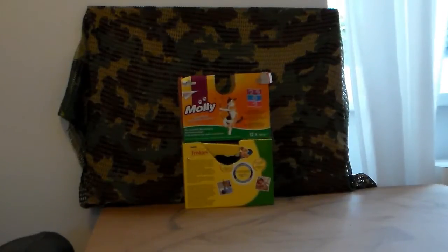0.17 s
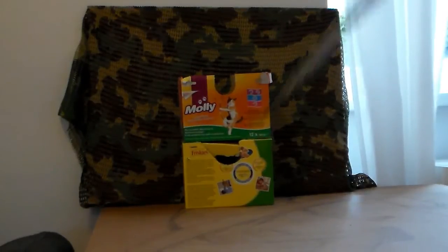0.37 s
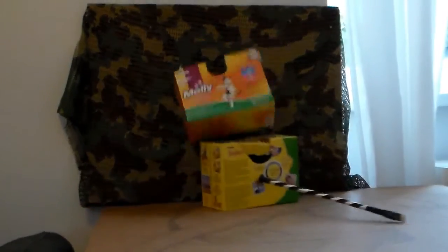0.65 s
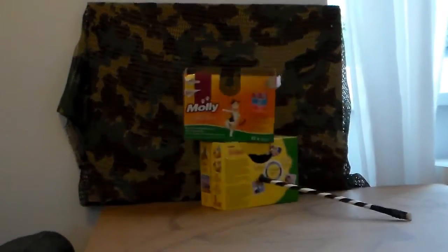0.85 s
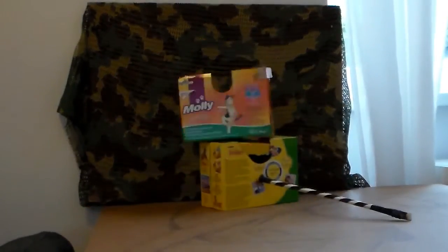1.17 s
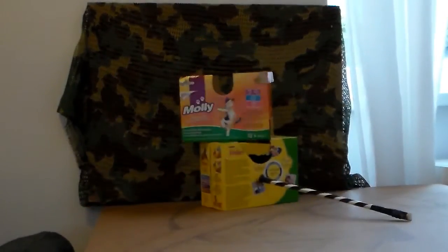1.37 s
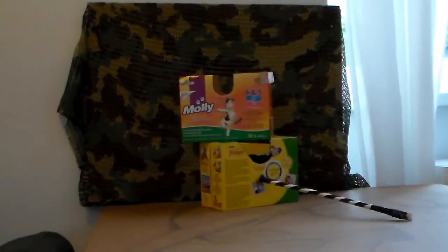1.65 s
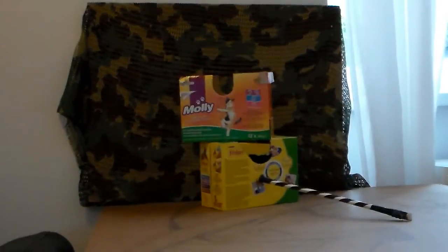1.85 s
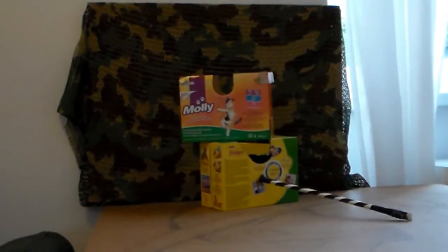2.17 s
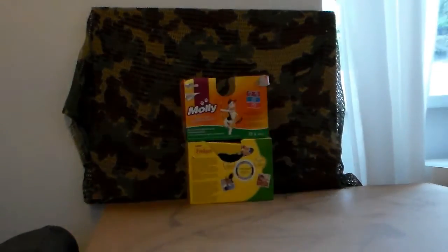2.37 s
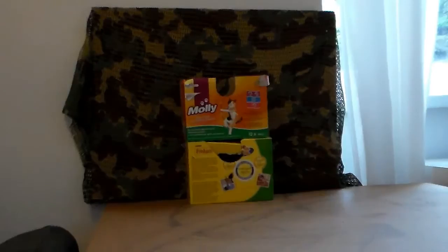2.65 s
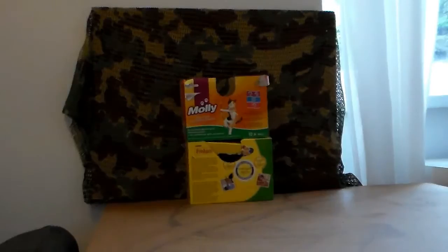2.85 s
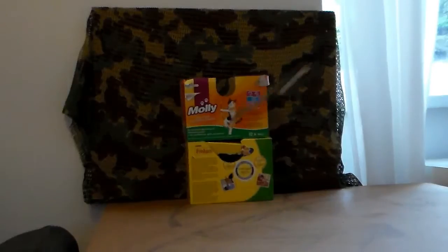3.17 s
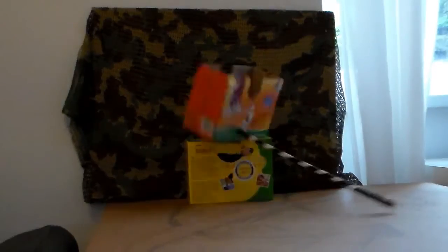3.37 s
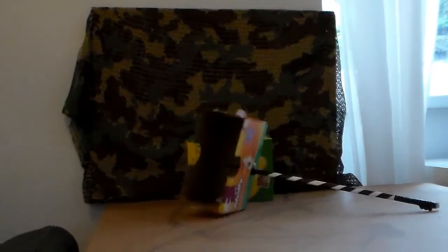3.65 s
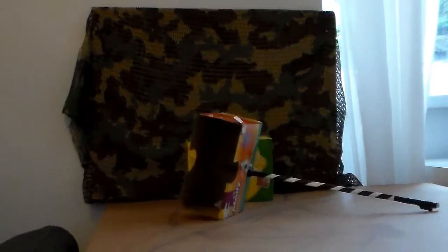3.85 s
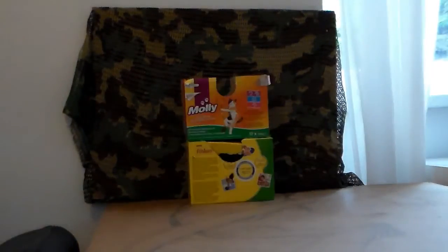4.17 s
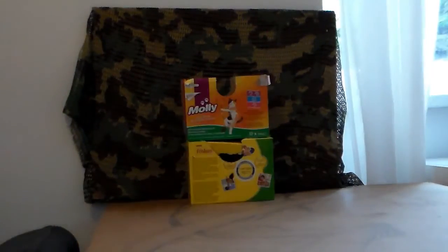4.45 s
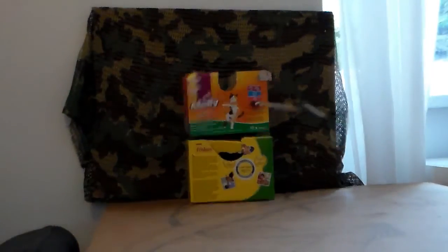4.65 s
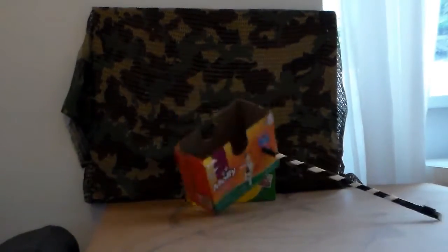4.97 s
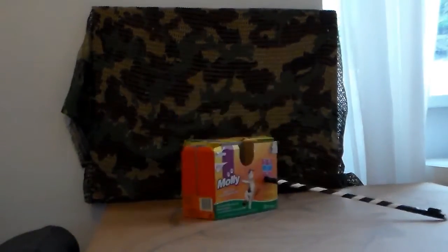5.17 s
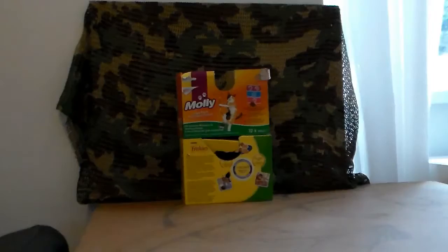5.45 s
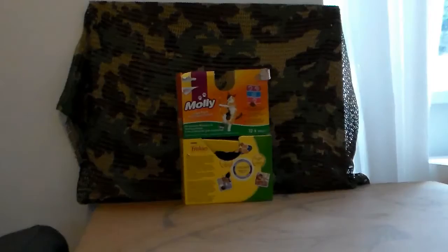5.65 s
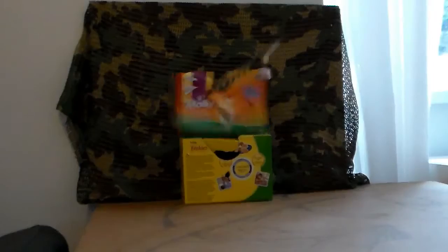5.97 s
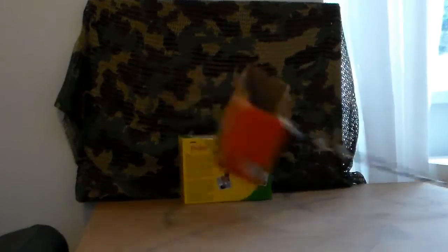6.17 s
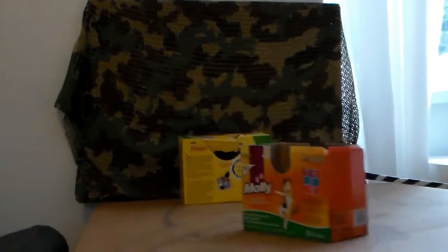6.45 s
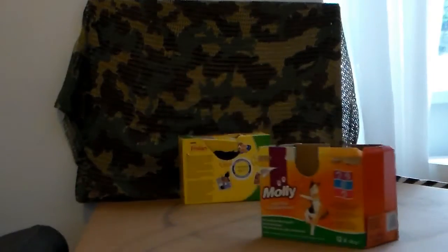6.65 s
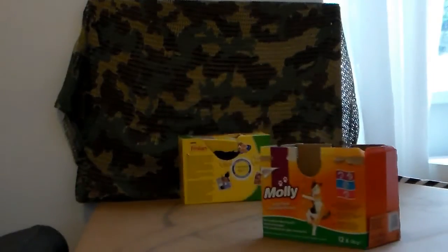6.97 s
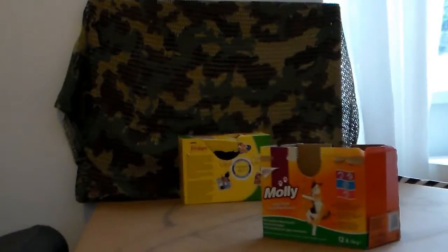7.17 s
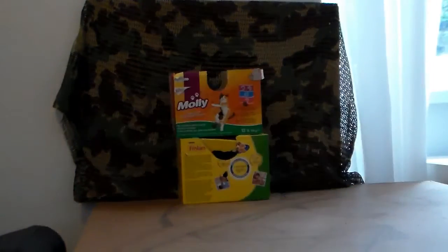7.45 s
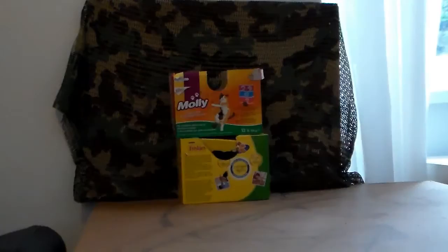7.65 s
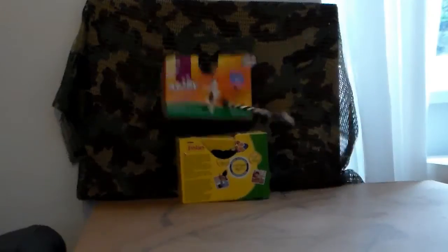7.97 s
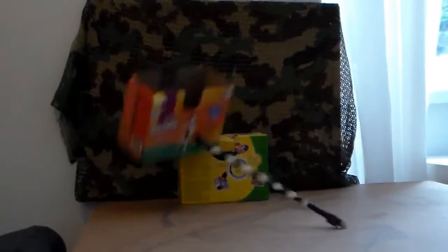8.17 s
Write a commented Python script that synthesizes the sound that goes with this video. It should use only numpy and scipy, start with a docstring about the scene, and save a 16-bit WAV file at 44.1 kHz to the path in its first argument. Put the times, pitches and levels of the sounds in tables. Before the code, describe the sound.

Close to the microphone, a launcher's catch clicks and its rubber bands crack brightly. A moment later, across a table, an arrow punches through a hollow cardboard box with a boomy, tearing smack, and the box rattles and bumps down. This happens five times, with varied tumbles. Between shots come a faint steady motor hum and room noise, which duck after each snap. Small, lively room, stereo.

```python
"""Close to the microphones a rubber-band launcher fires five arrows: its catch clicks and its bands snap, as
short bursts of shaped noise. Across the table in a small room stand stacked cardboard boxes: the arrow smacks
through the card and the box tumbles and bumps on the table, as ringing modes, noise bursts and rattling.
Far off a motor hums, as a sum of sines, over the noise of the room; this background dips after each snap and
changes level between the shots. The room answers with dense, decaying noise."""
import sys
import numpy as np
from scipy import signal
from scipy.fft import rfft, irfft
from scipy.io import wavfile
from scipy.ndimage import uniform_filter1d

SR = 44100
rng = np.random.default_rng(int(sys.argv[2]) if len(sys.argv) > 2 else 0)


def wrap_up_sound(samples):
    """Save the sound to the file named by the first command line argument, as 16-bit audio."""
    columns = np.atleast_2d(samples).T
    # keep every value between -1 and 1, then stretch to whole-number steps
    tamed = np.clip(columns, -1, 1)
    steps = np.round(tamed * 32767).astype(np.int16)
    wavfile.write(sys.argv[1], SR, steps)


N = 366230

# moments at which the rattling and the dips end, whatever is left of them: time [s]
CUTOFFS_S = [3.925, 5.428, 7.225]


def from_db(db):
    """Gain of a level in dB."""
    return 10 ** (np.asarray(db) / 20)


def rms_one(x):
    """Scaled to rms 1."""
    return x / np.sqrt(np.mean(x ** 2) + 1e-20)


def at_hz(points, hz):
    """A curve of (frequency, value) points read on a log-frequency axis."""
    points = np.array(points)
    return np.interp(np.log(hz), np.log(points[:, 0]), points[:, 1])


def add(track, s, sound):
    """Mixes a sound in from time s."""
    at = round(s * SR)
    track[..., at:at + sound.shape[-1]] += sound[..., :N - at]


def next_cutoff(s, otherwise):
    """The first cutoff after time s, or the given time if that is earlier."""
    return min([otherwise] + [end for end in CUTOFFS_S if end > s])


def ring(push, hz, t60):
    """A damped resonator: a unit click sets a sine of initial height 1 ringing."""
    radius = from_db(-60 / (max(t60, .003) * SR))
    turn = 2 * np.pi * hz / SR
    return signal.lfilter([0, np.sin(turn)], [1, -2 * radius * np.cos(turn), radius ** 2], push + 1e-18)


def burst(spectrum, length, peak_hz, peak_db):
    """A crackle of uneven grain, dying exponentially, peak 1; and the same grain with an even colour."""
    size = 4096
    hz = np.fft.rfftfreq(size, 1 / SR) + 1
    lift_db = peak_db * np.exp(-(np.log2(hz / peak_hz) / 0.44) ** 2)
    colour = from_db(at_hz(spectrum, hz) + lift_db)
    fold = np.r_[1, np.full(size // 2 - 1, 2), 1, np.zeros(size // 2 - 1)]
    causal = np.exp(rfft(irfft(np.log(colour), size) * fold))   # minimum phase: nothing sounds early
    dying = np.exp(-np.arange(size) / SR / max(length, .0003))
    uneven = from_db(4.5 * rng.standard_normal(size))
    grains = rfft(rng.standard_normal(size) * uneven * dying)
    both = np.array([grains, grains / np.abs(grains)]) * causal
    crackle, even = irfft(both, size) * np.linspace(1, 0, size)
    crackle = crackle / np.abs(crackle).max()
    return np.array([crackle, rms_one(even * np.sqrt(dying)) * np.std(crackle)])


BAND_EDGES_HZ = 18 * 2 ** np.arange(0, 10.1, .5)


def stereo_bands(size, likeness):
    """Half-octave bands of stereo noise, each with its centre frequency; likeness sets mid against side."""
    white = rng.standard_normal((2, 2, size))
    for k, (low, high) in enumerate(zip(BAND_EDGES_HZ, BAND_EDGES_HZ[1:])):
        band = signal.butter(2, [low, high], "band", fs=SR, output="sos")
        mid, side = signal.sosfilt(band, white[k % 2])
        hz = np.sqrt(low * high)
        alike = np.clip(at_hz(likeness, hz), -1, 1)
        yield hz, np.sqrt(1 + alike) * mid + np.sqrt(1 - alike) * side * [[1], [-1]]


# background of each stretch, before the dips:
# (start [s], hum [dB], room murmur [dB], hiss [dB], rumble [dB], high hiss [dB])
BACKGROUND_STRETCHES = [(0, -45, -54.5, -55.5, -52.5, -63), (1.0, -47.5, -57, -58.5, -53.5, -65),
                        (2.327, -47, -53.5, -58, -52.5, -66), (3.925, -41, -47.5, -52.5, -50.5, -61.5),
                        (5.428, -50, -41.5, -47, -47, -58.5), (6.6, -52, -48, -54, -52, -65.5),
                        (7.225, -44.5, -49, -53, -48, -61.5)]
# dips of the background, a negative depth being a rise:
# (time [s], noise depth [dB], hold [s], recovery [s], hum depth [dB], extra hold of the hum [s])
BACKGROUND_DIPS = [(0.402, 15, 0.35, 0.16, 19, .1), (3.16, 10, 0.057, 0.16, 27, .6),
                   (3.77, 1, .12, .1, 1, .1), (4.585, 17, 0.35, 0.21, 28, .5), (5.19, 9, 0.25, .1, 3, .1),
                   (5.96, 25.5, 0.52, 0.055, 26, .1), (6.497, 20, .08, 0.071, 6, 0.054),
                   (7.874, -4.5, .04, .03, 18, 0.032), (7.912, 21, 0.18, 0.51, 27, .2)]
# part of the noise depth that each layer takes: murmur, hiss, rumble, high hiss [share]
DIP_SHARES = [0.99, .6, 0.96, 0.45]
DIP_FALL_S = 0.019


def background_levels():
    """Steady levels that step between stretches, less the dips: hum, murmur, hiss, rumble, high hiss in dB."""
    t = np.arange(N) / SR
    starts, *levels = np.transpose(BACKGROUND_STRETCHES)
    stretch = np.maximum(np.searchsorted(starts, t, "right") - 1, 0)
    steady = np.array(levels)[:, stretch]
    noise_dip, hum_dip = np.zeros((2, N))
    for s, depth_db, hold, back, hum_db, hum_longer in BACKGROUND_DIPS:
        active = t < next_cutoff(s, N / SR)
        noise_corners = np.cumsum([0, DIP_FALL_S, hold, back])
        hum_corners = np.cumsum([0, DIP_FALL_S, hold + hum_longer, back])
        noise_dip += active * np.interp(t - s, noise_corners, [0, depth_db, depth_db, 0])
        hum_dip += active * np.interp(t - s, hum_corners, [0, hum_db, hum_db, 0])
    dips = np.vstack([hum_dip, np.outer(DIP_SHARES, noise_dip)])
    return uniform_filter1d(steady - dips, size=300)   # smoothed over about 7 ms


# partials of the far motor: (multiple of HUM_HZ, relative level [dB])
MOTOR_PARTIALS = [(4, -34), (5, -14.5), (7, -21), (8, -22), (9, 0.5), (12, -25), (20, -26)]
HUM_HZ, HUM_SKIP_S = 97.05, 2.327   # the fundamental's phase skips half a turn at that time
# colour of the room's own noise inside each layer: (frequency [Hz], relative density [dB per Hz])
ROOM_TONE = [(20, -10), (51, -11.5), (110, -22.5), (160, -21.5), (280, -17.5), (480, -19.5), (700, -23.5),
             (1000, -25), (2000, -30.5), (4000, -38), (8000, -44), (14000, -49)]
# how alike the two microphones hear that noise: (frequency [Hz], left-right likeness [0-1])
ROOM_TONE_LIKENESS = [(60, 0.87), (130, 0.83), (290, 0.95), (630, 0.96), (1390, 0.82), (3060, 0.57),
                      (6720, 0.15), (14800, 0.011)]


def background():
    """A far motor's harmonics, slightly louder on the left, over four layers of the room's own noise."""
    hum_db, murmur_db, hiss_db, rumble_db, high_db = background_levels()
    skip = np.pi * (np.arange(N) > HUM_SKIP_S * SR)
    turn = 2 * np.pi * HUM_HZ * np.arange(N) / SR + skip
    hum = sum(from_db(db) * np.sqrt(2) * np.sin(k * turn + k * k) for k, db in MOTOR_PARTIALS)
    layers = np.zeros((4, 2, N))
    for hz, band in stereo_bands(N, ROOM_TONE_LIKENESS):
        layer = np.searchsorted([90, 1000, 6000], hz)   # borders in Hz
        layers[layer] += from_db(at_hz(ROOM_TONE, hz)) * band
    layer_levels = [rumble_db, murmur_db, hiss_db, high_db]
    noise = sum(from_db(db) * rms_one(layer) for db, layer in zip(layer_levels, layers))
    left_right = from_db([[.3], [-.3]])
    return from_db(hum_db) * hum * left_right + noise


# decay of the small room: (frequency [Hz], t60 [s])
ROOM_T60 = [(100, 0.93), (300, 0.62), (700, 0.43), (1500, 0.45), (3000, 0.39), (6000, 0.42), (12000, 0.24)]
# colour of its answer: (frequency [Hz], relative level [dB])
ROOM_COLOUR = [(100, -22.5), (300, -5), (700, 0), (1500, 7), (3000, 11), (6000, 2), (12000, 12)]
# how alike the answer is at both microphones: (frequency [Hz], left-right likeness [0-1])
ROOM_LIKENESS = [(100, 0.87), (700, 0.99), (2000, 0.81), (5000, 0.48), (12000, 1)]


def room(x):
    """The room answers with dense noise that builds up in a few ms and dies band by band."""
    t = np.arange(SR // 2) / SR
    echo = np.zeros((2, len(t)))
    for hz, band in stereo_bands(len(t), ROOM_LIKENESS):
        echo += from_db(at_hz(ROOM_COLOUR, hz) - 60 * t / at_hz(ROOM_T60, hz)) * band
    echo = echo * (1 - np.exp(-t / 0.00067))
    echo = echo / np.sqrt(np.sum(echo ** 2) / 2)
    return signal.fftconvolve(x[None], echo, axes=1)[:, :N]


# card brushing against cloth: (time [s], peak [dB], decay [s], centre of the colour change [Hz])
CLOTH_SCUFFS = [(1.004, -45, 0.024, 4400), (1.073, -30.5, 0.16, 4360), (3.48, -43, 0.081, 4800),
                (3.611, -36.5, 0.052, 3960), (3.66, -37, 0.045, 6650), (5.262, -36, 0.042, 4290),
                (5.3, -45, 0.021, 4020)]
# colour of the brushing: (frequency [Hz], relative density [dB per Hz])
RUSTLE_COLOUR = [(1000, -31), (2000, -3), (4000, -1.5), (7000, -2.5), (10000, -13), (14500, -16.5)]


def scuffs():
    """Card brushes cloth in bright, short rustles: direct sound, and what the room receives."""
    out = np.zeros((2, N))
    for s, level_db, length, hz in CLOTH_SCUFFS:
        add(out, s, from_db(level_db) * burst(RUSTLE_COLOUR, length, hz, peak_db=-3.0))
    return out


# modes of the cardboard box, struck by knock() and rattled by tumbling():
# (frequency [Hz], relative level [dB], t60 [s])
BOX_MODES = [(124.8, -7, 0.12), (174.5, -12.5, 0.15), (217.4, -5, 0.075), (266.7, -11, 0.095),
             (359, -1, 0.025), (443.5, -5, 0.12), (522, -5, 0.062), (586, 1, 0.037), (682, -2, 0.035),
             (793, 0.5, 0.026), (961, -3.5, 0.032), (1180, 7, 0.012), (1450, -8.5, 0.008)]


def knock(pitch_hz, t60, width, contact_s):
    """One blow on the box: modes near the struck wall's pitch ring most, and that wall rings on top; peak 1."""
    push = np.zeros(SR // 4)
    push[:64] = np.exp(-np.arange(64) / SR / contact_s)
    out = ring(push, pitch_hz, t60)
    for (hz, level_db, decay), chance in zip(BOX_MODES, rng.standard_normal(len(BOX_MODES))):
        lean_db = -width * abs(np.log2(hz / pitch_hz))   # width in dB per octave
        gain = from_db(level_db + lean_db + 2.3 * chance) * np.sign(chance)
        out += gain * ring(push, hz, decay)
    return out / np.abs(out).max()


RATTLE_ATTACK_S, SMACK_RATTLE_T60_S, SMACK_RATTLE_HIGH_DB = 0.014, 0.35, 1
BUMP_RATTLE_HIGH_DB, HIGH_FOLLOWS_TICK = -6.5, 0.43   # harder ticks stir the higher modes more
# pass band of the shuddering table: low and high edge [Hz]
TABLE_BAND = [34.2, 113]
TABLE_DB = -19.5   # against the low rattle


def tumbling():
    """Blows set the loose box rattling: many uneven contacts on its modes, dying away; the table shudders along."""
    struck = rng.random((len(BOX_MODES), N)) < 250.0 / SR   # about 250 contacts a second on each mode
    touches = struck * rng.laplace(size=struck.shape)
    rings = [from_db(level_db) * ring(t, hz, decay) for t, (hz, level_db, decay) in zip(touches, BOX_MODES)]
    low, high = rms_one(sum(rings[:5])), rms_one(sum(rings[5:11]))
    blows = [(row[0], row[-1], SMACK_RATTLE_T60_S, SMACK_RATTLE_HIGH_DB) for row in CARD_SMACKS]
    for s, _, _, tick_db, level_db, t60 in TABLE_BUMPS:
        blows.append((s, level_db, t60, BUMP_RATTLE_HIGH_DB + HIGH_FOLLOWS_TICK * tick_db))
    power = np.zeros((2, N))
    for s, level_db, t60, high_db in blows:
        t = np.arange(0, next_cutoff(s, s + t60) - s, 1 / SR)
        shape = np.minimum(t / RATTLE_ATTACK_S, 1) * from_db(level_db - 60 * t / t60)
        add(power, s, (shape * from_db([[0], [high_db]])) ** 2)
    low_level, high_level = np.sqrt(power)
    band = signal.butter(2, TABLE_BAND, "band", fs=SR, output="sos")
    table = rms_one(signal.sosfilt(band, rng.standard_normal(N)))
    return low_level * low + high_level * high, from_db(TABLE_DB) * low_level * table


# box corners and arrow tail on the table; tick is relative to the peak, rattle is played by tumbling():
# (time [s], peak [dB], pitch [Hz], tick [dB], rattle [dB], rattle t60 [s])
TABLE_BUMPS = [(.693, -24, 291, -28, -33, 0.48), (.724, -17.5, 252, -28, -37.5, 0.47),
               (.773, -20, 225, -22, -32.5, 0.62), (.806, -37, 367, -2, -40, 0.26),
               (.86, -32, 250, -7.5, -34, 1.4), (0.901, -27, 178, 4.5, -32, 0.32),
               (.912, -14, 213, -27, -23.5, 0.45), (.985, -29, 139, 3.7, -52, 0.5),
               (1.218, -23, 165, 0, -26.5, 0.32), (1.401, -34, 179, -23, -47, 0.25),
               (3.432, -23, 272, -30, -38, 0.37), (3.453, -19.5, 326, -13, -30.5, 2.3),
               (3.577, -11, 158, -9.5, -18.5, 0.45), (3.664, -14.5, 202, -35, -29.5, 1.5),
               (3.767, -11, 296, -12, -29, 1.1), (4.836, -12.5, 333, -18, -31.5, 0.77),
               (4.894, -22, 214, -18, -39, 0.17), (4.997, -18, 294, -17, -31.5, 1.1),
               (5.043, -30, 195, -34, -31.5, 1.6), (5.089, -23, 216, -30, -33, 1.8),
               (5.136, -17, 272, -40, -29.5, 1.3), (5.188, -10.5, 376, -5, -20.5, 0.69),
               (5.259, -22, 282, -27, -28.5, 1.2), (6.284, -20, 255, -21, -27.5, 0.55),
               (6.324, -17, 321, -16, -38, 0.26), (6.427, -33, 230, -44, -31.5, 0.24),
               (6.5, -17, 550, -2, -32.5, 0.72), (6.668, -36, 255, -17, -37.5, 0.56),
               (6.782, -40, 254, -25, -45, 0.33), (8.218, -19.5, 393, -18, -35, .7),
               (8.292, -25, 196, -28, -38, .6)]
# colour of the edge's tick: (frequency [Hz], relative density [dB per Hz])
TICK_COLOUR = [(500, -25), (900, 6), (1300, -0.5), (2200, -10.5), (3500, -18.5), (7000, -25), (14000, -41)]
TICK_HZ, TICK_S = 1210, 0.0031
BUMP_FACE_DB = -5.5   # knock of the face, against the tick
FACE_HZ, FACE_T60_S = 1252, 0.012   # the struck face of the box, in bumps and smacks


def bumps():
    """Soft, dull landings with a tick where an edge hits: direct sound, and what the room receives."""
    out = np.zeros((2, N))
    for s, level_db, hz, tick_db, *_ in TABLE_BUMPS:
        edge_db = level_db + tick_db
        face = knock(FACE_HZ, FACE_T60_S, width=5.3, contact_s=.00006)
        add(out, s, from_db(level_db) * knock(hz, 0.068, width=6.5, contact_s=0.00044))
        add(out, s, from_db(edge_db) * burst(TICK_COLOUR, TICK_S, TICK_HZ, peak_db=2.0))
        add(out, s, from_db(edge_db + BUMP_FACE_DB) * face)
    return out


# arrow into card; tearing, tick, face and room are relative to the peak, rattle is played by tumbling():
# (time [s], peak [dB], wall pitch [Hz], wall t60 [s], tearing [dB], tip tick [dB], face knock [dB],
# room [dB], rattle [dB])
CARD_SMACKS = [(0.5385, -9.5, 520, 0.027, -9.5, -23, -3.5, 2.5, -21.5),
               (3.276, -2, 695, 0.078, -19, -10, -9, 3.5, -44),
               (3.283, -4, 604, 0.097, -25, -17.5, -9.5, -5, -32.5),
               (4.707, -7, 740, 0.057, -9.5, -9.5, -4.5, 4.5, -39),
               (4.715, -4, 790.6, 0.096, -23.5, -21.5, -16, -9, -28),
               (6.073, -18.5, 418, 0.028, -3.5, -4, -5, 5.5, -27),
               (6.086, -12.5, 630, 0.064, 1.5, -14, 1, 0.5, -26.5),
               (8.0389, -6.5, 657, 0.06, -7.5, -13.5, -5.5, 1.5, -26.5),
               (8.044, -14, 492, 0.13, -14, -22, -13, -5, -33)]
# colour of tearing card: (frequency [Hz], relative density [dB per Hz])
TEAR_COLOUR = [(590, -79.5), (1000, 1.5), (1770, -7.5), (2240, -9.5), (2600, -10.5), (4760, -10),
               (6250, -11), (13300, -25), (15200, -77)]
# colour of crushed card: (frequency [Hz], relative density [dB per Hz])
CRUNCH_COLOUR = [(200, -29), (400, 6), (650, 3.5), (1000, -8.5), (1500, -6), (2500, -17), (8000, -39)]
CRUNCH_DB = -1.5
# a thin, blurred ring after some tears: (time [s], rms [dB], frequency [Hz])
PAPERY_RINGS = [(.545, -53, 3320), (4.72, -50.5, 3240)]
PAPER_T60_S, PAPER_FLUTTER_S = .035, .08


def smacks():
    """The tip ticks, tears and crushes the card, the walls boom: direct sound, and what the room receives."""
    out = np.zeros((2, N))
    for s, level_db, hz, t60, tear_db, tick_db, face_db, room_db, _ in CARD_SMACKS:
        gains = from_db(level_db + np.array([[0], [room_db]]))
        wall = knock(hz, t60, width=27.3, contact_s=.00008)
        face = knock(FACE_HZ, FACE_T60_S, width=25.0, contact_s=.00008)
        crunch = burst(CRUNCH_COLOUR, 0.0073, hz, peak_db=9.0)
        tear = burst(TEAR_COLOUR, 0.01, 750, peak_db=-6.5)
        tick = burst(SNAP_COLOUR, 0.0026, 6940, peak_db=13.5)
        add(out, s, gains * wall)
        add(out, s, gains * from_db(face_db) * face)
        add(out, s, gains * from_db(CRUNCH_DB) * crunch)
        add(out, s, gains * from_db(tear_db) * tear)
        add(out, s - .0008, gains * from_db(tick_db) * tick)   # the tip touches first
    for s, level_db, hz in PAPERY_RINGS:
        fade = np.exp(-np.arange(SR // 4) / SR / PAPER_FLUTTER_S)
        flutter = rng.standard_normal(SR // 4) * fade
        add(out[0], s, from_db(level_db) * rms_one(ring(flutter, hz, PAPER_T60_S)))
    return out


# catch and small ticks of the launcher, and at 1.073 s the sharp start of the card brushing cloth; ring is
# relative to the burst's peak: # (time [s], burst peak [dB], lift centre [Hz], left-right [dB], decay [s], lift
# [dB], ring [dB])
CATCH_CLICKS = [(1.073, -24, 4360, 0., .0015, 8, -15), (3.09, -18.5, 2000, 3, 0.0021, 4.5, -30),
                (3.1743, -24, 3850, 2.5, 0.0013, 1, -2.5), (4.521, -18, 2640, 2, 0.0031, 9.5, -7),
                (5.785, -33, 4340, 9, 0.0015, 13, -25.5), (5.905, -23, 2380, 0, 0.0017, 0, -25),
                (5.974, -29.5, 2500, 0., .002, 4, -24), (7.8614, -13.5, 2660, -3, 0.0017, 12, -0.5),
                (7.932, -33.5, 2400, -5, .002, 5, -14)]
CLICK_POP_DB, CLICK_ROOM_DB, CLICK_RING_T60_S = -16.5, 3, 0.014   # levels against the burst's peak
# cracks of the released bands; room is relative to the burst's peak:
# (time [s], burst peak [dB], lift centre [Hz], left-right [dB], decay [s], lift [dB], room [dB])
BAND_CRACKS = [(0.3772, -16, 2350, -11, 0.00069, 7, 5), (.381, -0.5, 7440, 1.1, 0.0034, 8, -4.5),
               (3.151, -9, 2370, 2, 0.0029, 7, -7), (3.1527, -5.5, 5400, -8, 0.0026, 4.5, -10),
               (3.159, -15, 7600, 13, 0.0019, 6, -7), (4.574, -9, 2680, 8, 0.0031, 10, -13),
               (4.5771, -2.5, 2620, -4, 0.004, -1, -8), (5.944, -15.5, 3350, 10, 0.0038, 3, -7),
               (5.9502, -1, 5600, -3.5, 0.0028, 4, -8.5), (7.905, -7.5, 2500, -11.5, 0.0015, -8.5, -15),
               (7.9086, -3.5, 5290, 6.5, 0.0027, 0.5, -7.5)]
CRACK_POP_DB = -25
# colour of snaps, also of the arrow tip's tick: (frequency [Hz], relative density [dB per Hz])
SNAP_COLOUR = [(88, -46.5), (150, -4), (690, 0.5), (2040, 1.5), (2420, -1.5), (2720, -1), (4010, -3.5),
               (5780, -1.5), (8510, -6.5), (13800, -13), (15200, 4.5)]


def launcher():
    """Catch and bands crack brightly, with a small low pop: left, right, and what the room receives."""
    out = np.zeros((3, N))
    sounds = [(*row, CLICK_ROOM_DB, CLICK_POP_DB) for row in CATCH_CLICKS]
    sounds += [(*row[:6], -np.inf, row[6], CRACK_POP_DB) for row in BAND_CRACKS]   # bands do not ring
    pop = np.hanning(200) * np.sin(np.arange(200) / 100 * np.pi)
    for s, level_db, hz, pan_db, length, lift_db, ring_db, room_db, pop_db in sounds:
        crack, even = from_db(level_db) * burst(SNAP_COLOUR, length, hz, lift_db)
        click = signal.unit_impulse(len(crack))
        crack += from_db(level_db + ring_db) * ring(click, hz, CLICK_RING_T60_S)
        crack[:200] += from_db(level_db + pop_db) * pop
        left, right = crack * from_db(pan_db / 2), crack * from_db(-pan_db / 2)
        add(out, s, np.array([left, right, from_db(room_db) * even]))
    return out


BOX_LOW_CUT_HZ = 136


def scene():
    """Launcher near the microphones, boxes across the table, the room's answer and the background."""
    near = launcher()
    rattle, shudder = tumbling()
    # a small box radiates no deep bass
    small = signal.butter(3, BOX_LOW_CUT_HZ, "high", fs=SR, output="sos")
    hits = signal.sosfilt(small, smacks())
    falls = signal.sosfilt(small, bumps() + rattle + scuffs())
    wet = room(near[2] + hits[1] + from_db(-2.5) * falls[1])
    return near[:2] + hits[0] + falls[0] + shudder + wet + background()


# balance of the two microphone ports: (frequency [Hz], left-right [dB])
PORT_BALANCE = [(60, 1), (110, 2), (200, 1), (380, 1), (690, 0.5), (1280, 0.0), (2350, -0.5), (4340, 0),
                (8000, -0.5), (14800, -1)]
# phase between them: (frequency [Hz], lead of the left [rad])
PORT_PHASE = [(100, 0.22), (2800, 0.15), (5000, -0.54), (8500, -1.3), (14000, -1.7)]
CUTOFF_HZ = 14800


def record(dry):
    """The two microphone ports differ in colour and phase, the highest peaks are rounded, the top is cut."""
    hz = np.fft.rfftfreq(N, 1 / SR) + 1
    half = from_db(at_hz(PORT_BALANCE, hz) / 2) * np.exp(.5j * at_hz(PORT_PHASE, hz))
    ports = irfft(rfft(dry) * [half, 1 / half], N)
    rounded = 1.489 * np.tanh(ports / 1.459)
    return signal.sosfilt(signal.cheby2(14, 45, CUTOFF_HZ, fs=SR, output="sos"), rounded)


dry = scene()
out = record(dry)
wrap_up_sound(out)
```